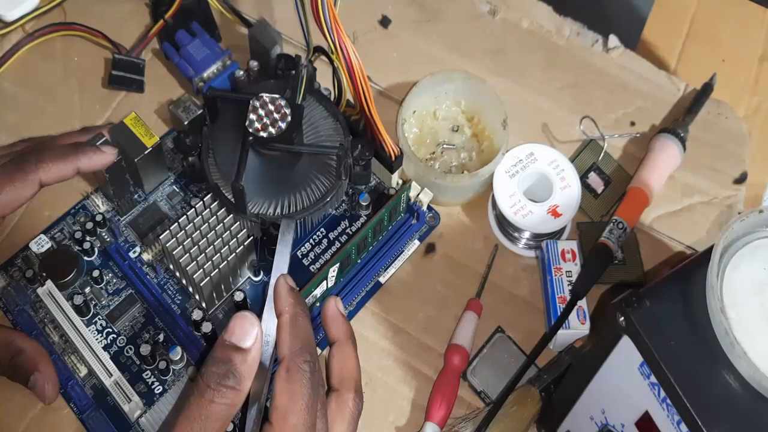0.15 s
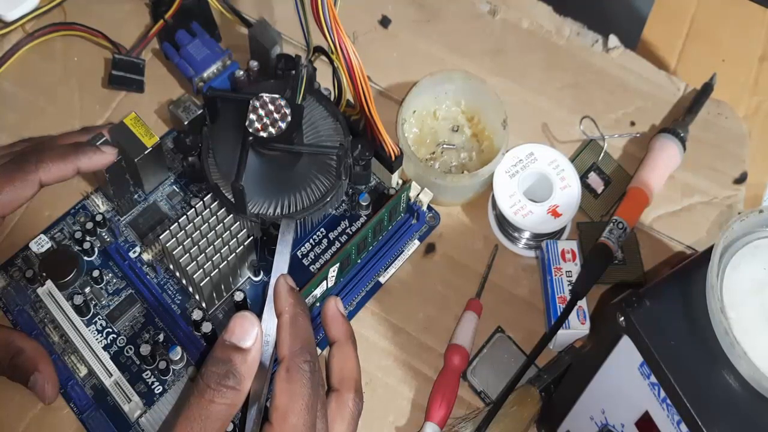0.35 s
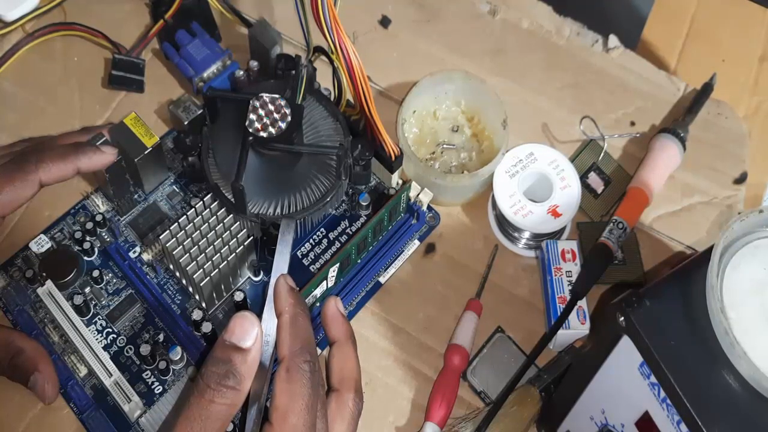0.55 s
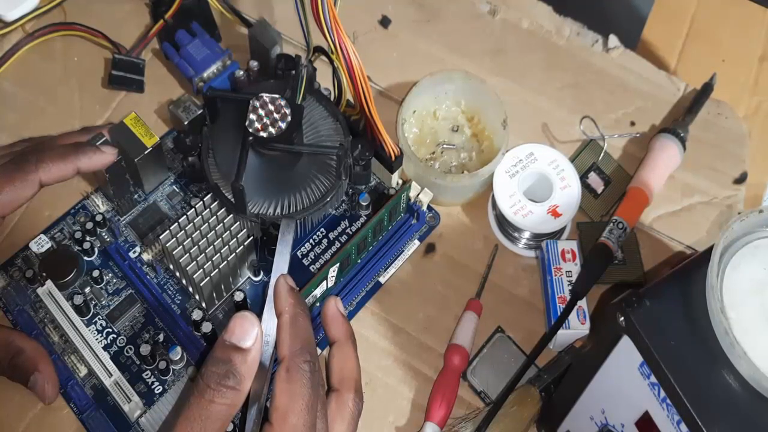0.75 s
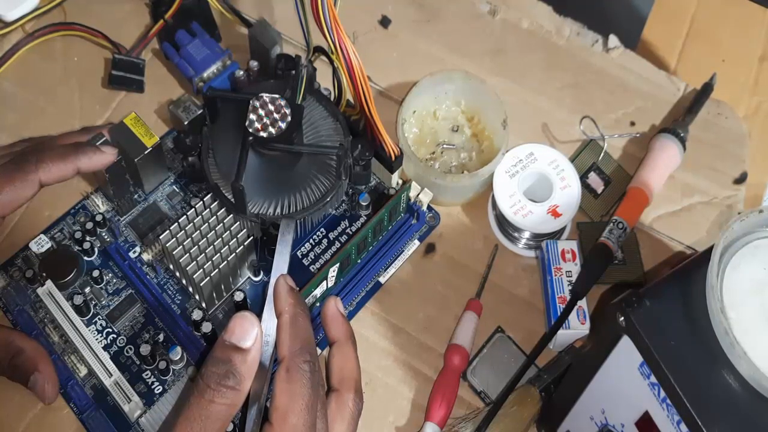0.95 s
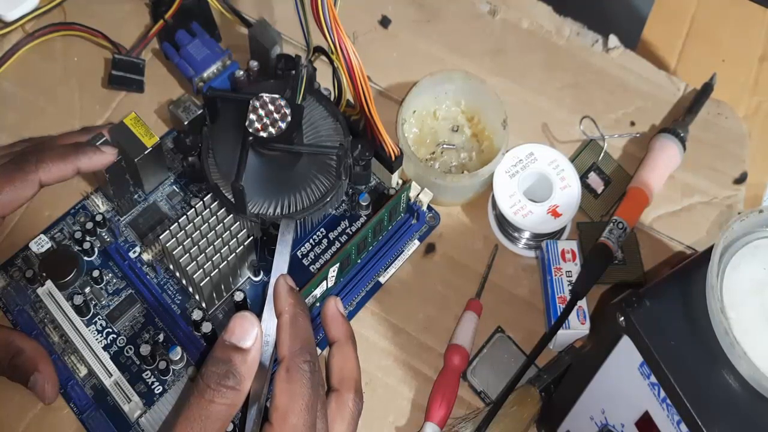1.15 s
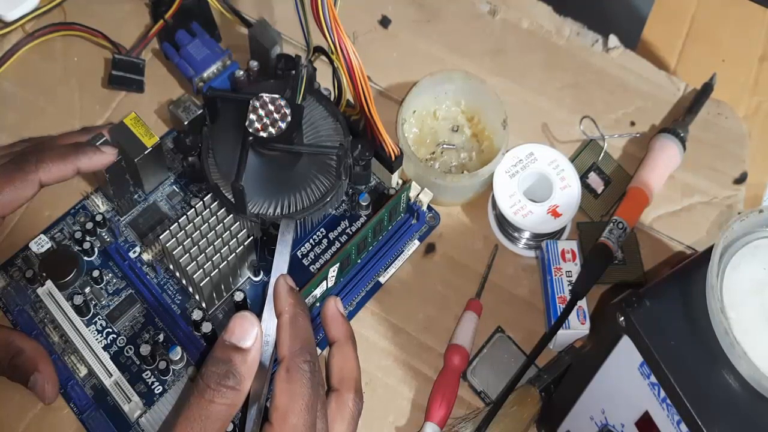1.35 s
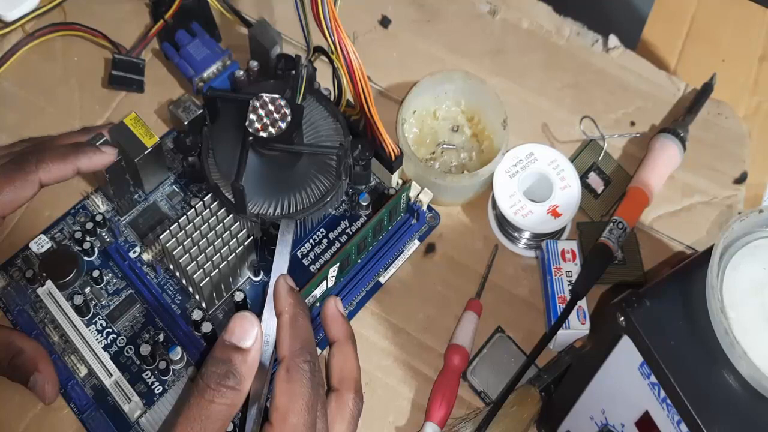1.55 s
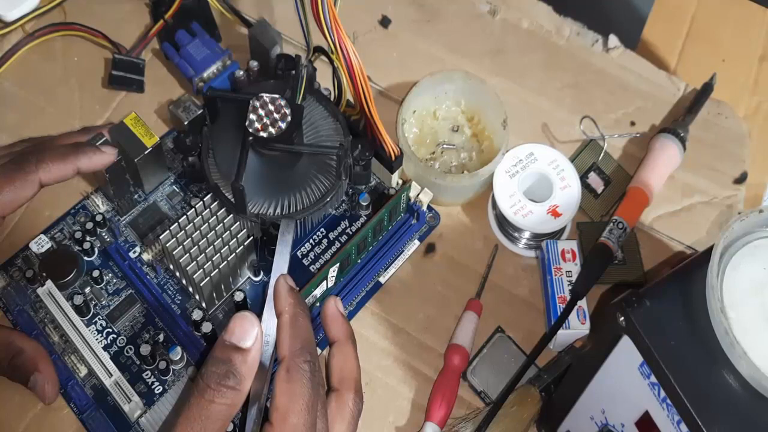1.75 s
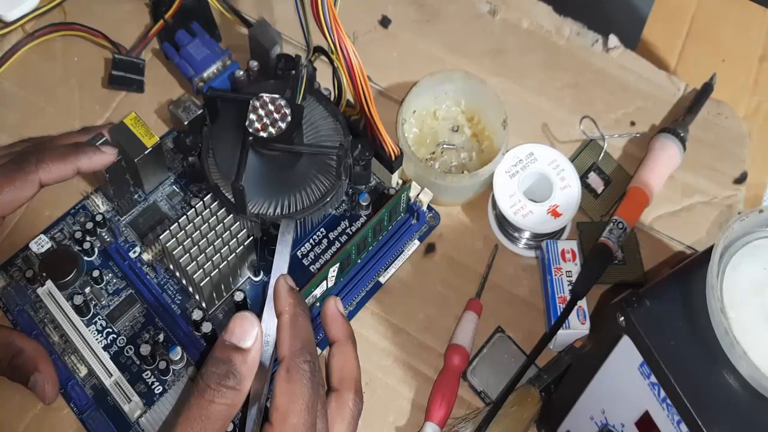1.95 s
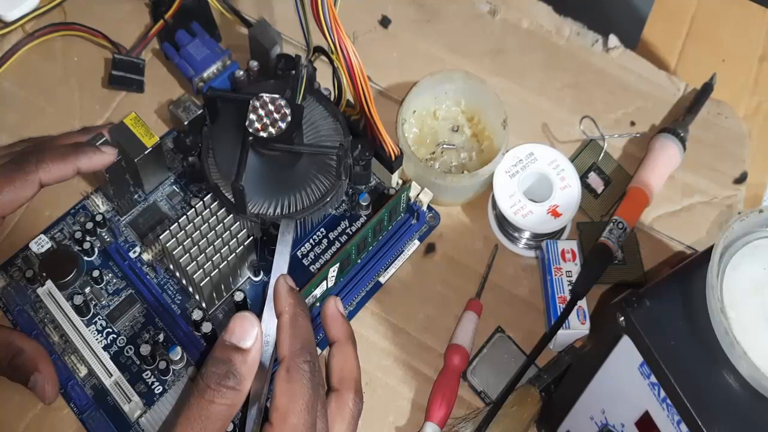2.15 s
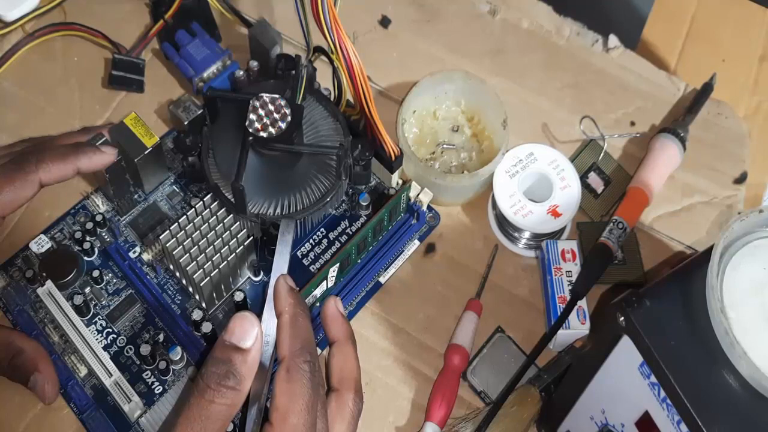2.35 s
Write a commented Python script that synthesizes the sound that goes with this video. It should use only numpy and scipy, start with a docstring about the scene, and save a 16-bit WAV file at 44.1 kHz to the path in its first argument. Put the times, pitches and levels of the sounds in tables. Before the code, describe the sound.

A small computer cooling fan spins constantly from 0 to about 2.5 seconds, close to a single microphone at an indoor workbench. Deep, steady mains hum lies beneath a dull, low-mid rush of air through metal fins, gusting slightly several times a second. Thin motor and blade tones waver, swelling gently near 0.85, 1.3 and 1.85 seconds. Treble hiss is very faint; no start, stop or handling sounds.

```python
"""On a workbench, a small cooling fan runs steadily, heard close by one microphone.
Mains hum sits below: the fundamental and its odd harmonics, built from sines that crest together.
Shaped noise makes the faint treble hiss and the dull, gusting air rush through the heat-sink fins.
The motor and blades sing thin, wavering sines; the two strongest swell and fade."""
import sys
import numpy as np
from scipy import signal
from scipy.fft import rfft, irfft
from scipy.io import wavfile

SR = 44100
rng = np.random.default_rng(int(sys.argv[2]) if len(sys.argv) > 2 else 0)


def generate_wav(signal):
    """Clip the signal to [-1, 1] and save it as 16-bit WAV at the path in sys.argv[1]."""
    frames = np.transpose(np.atleast_2d(signal))
    scaled = np.clip(frames, -1, 1) * 32767
    pcm = np.round(scaled).astype(np.int16)
    wavfile.write(sys.argv[1], SR, pcm)


N = 110250  # 2.5 s


def from_db(db):
    """Turn decibels into an amplitude gain."""
    return 10 ** (np.asarray(db) / 20)


def drift(rate_hz):
    """Slow random wander of spread 1: noise through two equal one-pole low-passes."""
    step = 40  # samples between drift points
    warm_up = 2000  # points dropped while the filter settles
    pole = np.exp(-2 * np.pi * rate_hz * step / SR)
    noise = rng.standard_normal(N // step + warm_up + 2)
    slow = signal.lfilter([1], [1, -2 * pole, pole ** 2], noise)[warm_up:]
    return np.interp(np.arange(N) / step, np.arange(len(slow)), slow / slow.std())


def banded_noise(spectrum, patchy_db, shared_db, from_hz):
    """Shaped noise in half-octave bands that flicker alone and, towards the treble, also together."""
    hz, db = np.transpose(spectrum)
    octave = np.log2(np.maximum(np.fft.rfftfreq(N, 1 / SR), 1))
    density_db = np.interp(octave, np.log2(hz), db, left=-140, right=db[-1])
    # unit white noise spreads its power over SR / 2
    coloured = rfft(rng.standard_normal(N)) * from_db(density_db) * np.sqrt(SR / 2)
    out = np.zeros(N)
    for centre in np.arange(4, 15, 0.5):  # in octaves above 1 Hz
        crossfade = np.clip(1 - 2 * abs(octave - centre), 0, 1)
        band = irfft(coloured * crossfade, N)
        # the shared movement fades in over the octave below from_hz
        share = np.clip(centre - np.log2(from_hz) + 1, 0, 1)
        out += band * from_db(patchy_db * drift(6.4) + shared_db * share)
    return out


# Mains hum, the fundamental and its odd harmonics: (multiple of the mains frequency, level [dB rms])
HUM_HARMONICS = [(1, -36), (3, -49.5), (5, -60), (9, -57)]
MAINS_HZ, HUM_WAVER_DB = 50.38, 0.26


def mains_hum():
    """The fundamental and odd harmonics crest together and waver slightly, from a zero crossing."""
    turn = 2 * np.pi * MAINS_HZ * np.arange(N) / SR + np.pi / 2
    wave = np.zeros(N)
    for multiple, db in HUM_HARMONICS:
        wave += np.sqrt(2) * from_db(db) * np.cos(multiple * turn)  # rms to peak
    return wave * from_db(HUM_WAVER_DB * drift(5))


# Spectrum of the treble hiss: (frequency [Hz], density [dB per Hz])
HISS_SPECTRUM = [(800, -105), (1600, -101.5), (2200, -103.5), (2700, -107), (3150, -106.5), (3360, -102.5),
                 (3500, -104.5), (3680, -109), (3850, -107), (4100, -110), (4500, -107), (4800, -114),
                 (6800, -115), (7250, -111), (7800, -116), (8350, -112), (8700, -115), (10300, -116),
                 (11100, -114), (12300, -115), (13000, -119), (15000, -117)]
HISS_PATCHY_DB, HISS_FLUTTER_DB = 0.37, 0.52


def treble_hiss():
    """Faint noise of blade tips and microphone, with a fast shared flutter and patchy bands."""
    flutter_db = HISS_FLUTTER_DB * drift(60)
    return banded_noise(HISS_SPECTRUM, HISS_PATCHY_DB, flutter_db, HISS_SPECTRUM[0][0])


# Spectrum of the air through the fins: (frequency [Hz], density [dB per Hz])
AIR_SPECTRUM = [(25, -85), (45, -70.5), (80, -69), (95, -78), (130, -74), (165, -76.5), (195, -74),
                (230, -75), (280, -78.5), (310, -72), (345, -71.5), (380, -72), (430, -70), (600, -71),
                (680, -73.5), (720, -77), (800, -80), (1000, -90.5), (1100, -94), (1170, -92), (1350, -99),
                (2000, -107), (4000, -125)]
# Gusts of the air rush around its mean: (time [s], level [dB])
AIR_GUSTS = [(0, 0), (.14, 0), (.3, 1), (.45, -2.5), (.55, -.5), (.66, -0.5), (.76, -1.5), (.85, 1.5),
             (1.0, -1), (1.15, 0), (1.25, -1), (1.35, 2), (1.48, -2), (1.6, 1), (1.7, 0.5), (1.82, 0),
             (1.95, 1), (2.1, 1), (2.25, 0.5), (2.4, -.5), (2.5, 0)]
AIR_PATCHY_DB, GUST_FROM_HZ = 0.4, 220


def air_rush():
    """Dull turbulent noise between the fins; gusts move its upper bands, the lowest stay out of them."""
    time_s, level_db = np.transpose(AIR_GUSTS)
    gust_db = np.interp(np.arange(N) / SR, time_s, level_db)
    return banded_noise(AIR_SPECTRUM, AIR_PATCHY_DB, gust_db, GUST_FROM_HZ)


# Steady tones of motor and blades: (frequency [Hz])
STEADY_HZ = [106.1, 674.3, 780.6, 818.2, 881, 924.3, 1030.4, 1068, 1193, 1230.6, 1296.3, 1663, 2261.9, 2324,
             2835.2, 2961.8, 3322.5, 3368, 3554.4, 3605.3, 3742.4, 3855.2, 4226.9, 4458.9, 7445.1, 8349.5]
# Mean level of each steady tone, in the same order: (level [dB rms])
STEADY_DB = [-55, -60.5, -68.5, -69.5, -78, -70.5, -79, -84, -75.5, -94, -85.5, -91.5, -86, -88, -92, -88,
             -100, -93, -94, -93, -92, -90, -91, -100, -100, -102]
# The two strongest fan tones: (frequency [Hz])
SWELLING_TONES_HZ = [336.3, 568.4]
# How those two swell and fade: (time [s], lower tone level [dB rms], upper tone level [dB rms])
TONE_SWELLS = [(0, -52, -65), (.15, -46.5, -53), (.35, -49, -52.5), (.45, -49, -74), (.55, -48.5, -63),
               (.7, -50, -49.5), (.85, -46, -54), (1.0, -50.5, -52), (1.2, -51.5, -57), (1.33, -45, -54),
               (1.5, -51, -54), (1.68, -52.5, -54.5), (1.84, -44.5, -51), (1.95, -48, -58),
               (2.05, -48.5, -50), (2.17, -47.5, -57.5), (2.33, -47, -55), (2.5, -54.5, -56)]
TONE_WAVER_DB = 1
# phase wander: a base amount, plus more for higher tones
WANDER_RAD, WANDER_RAD_PER_KHZ = 0.25, 0.6


def fan_tone(hz, level_db):
    """One sine from a random starting phase that then wanders slowly, further for higher tones."""
    turns = hz * np.arange(N) / SR + rng.random()
    wander = (WANDER_RAD + WANDER_RAD_PER_KHZ * hz / 1000) * drift(1.38)
    return np.sqrt(2) * from_db(level_db) * np.sin(2 * np.pi * turns + wander)


def motor_and_blades():
    """Thin spinning tones: the steady ones waver in level, the two strongest follow their swells."""
    tones = np.zeros(N)
    for hz, db in zip(STEADY_HZ, STEADY_DB):
        tones += fan_tone(hz, db + TONE_WAVER_DB * drift(1.53))
    time_s, *swells_db = np.transpose(TONE_SWELLS)
    for hz, swell_db in zip(SWELLING_TONES_HZ, swells_db):
        tones += fan_tone(hz, np.interp(np.arange(N) / SR, time_s, swell_db))
    return tones


def scene():
    """Layer the hum, hiss, air rush and fan tones into one channel."""
    mix = mains_hum() + treble_hiss() + air_rush() + motor_and_blades()
    return mix[None]


CUTOFF_HZ = 15300  # the cut is 60 dB deep from here up


def record(dry):
    """Cut the top steeply, with the filter already settled on the first sample."""
    sos = signal.cheby2(30, 60, CUTOFF_HZ, fs=SR, output="sos")
    settled = signal.sosfilt_zi(sos) * dry[0, 0]
    filtered, _ = signal.sosfilt(sos, dry[0], zi=settled)
    return filtered[None]


dry = scene()
out = record(dry)
generate_wav(out)
```